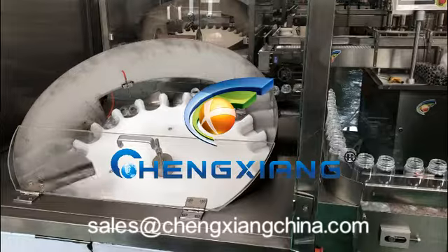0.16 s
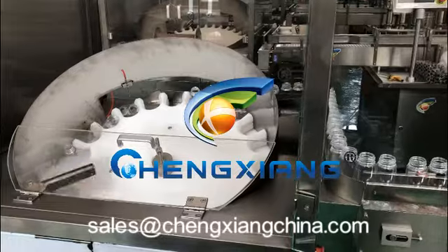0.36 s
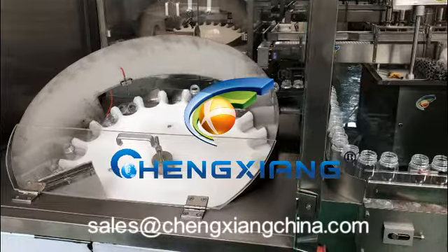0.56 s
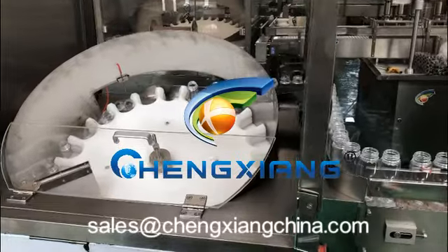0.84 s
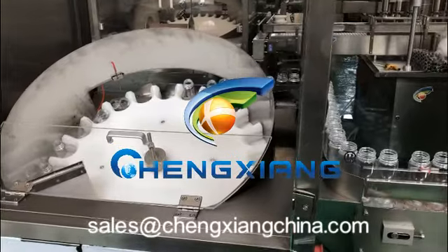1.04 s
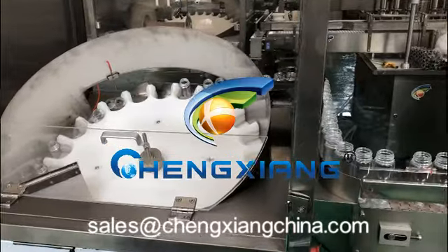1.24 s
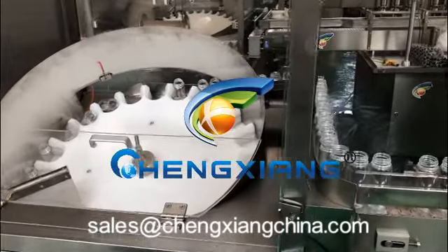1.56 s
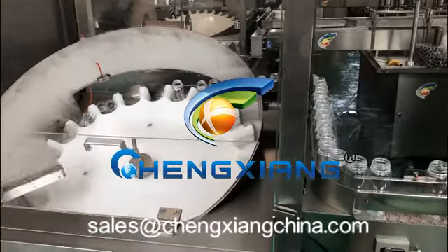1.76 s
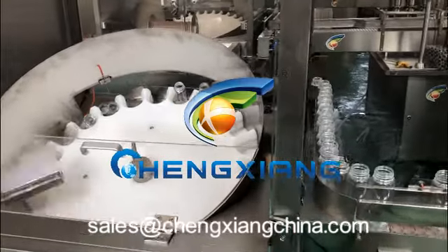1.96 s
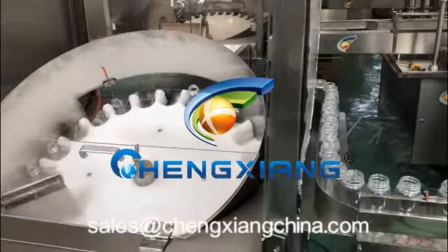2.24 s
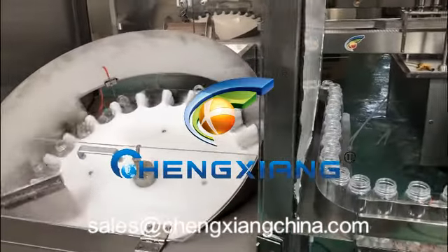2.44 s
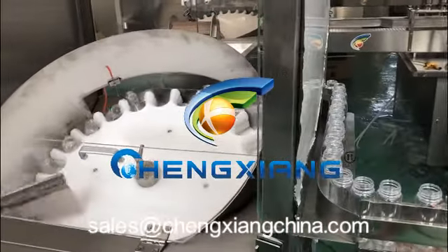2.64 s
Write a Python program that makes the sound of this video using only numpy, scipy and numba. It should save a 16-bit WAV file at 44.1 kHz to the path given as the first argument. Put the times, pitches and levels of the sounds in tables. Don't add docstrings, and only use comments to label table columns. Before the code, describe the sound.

Bottle sorting machine runs steadily, empty plastic bottles clattering amid compressed air bursts and constant hiss

```python
import sys
import numpy as np
from scipy import signal
from scipy.fft import rfft, irfft
from scipy.io import wavfile
from scipy.ndimage import uniform_filter1d
from numba import njit

SR = 44100
rng = np.random.default_rng(int(sys.argv[2]) if len(sys.argv) > 2 else 0)


def wav_out(sig):
    wavfile.write(sys.argv[1], SR, np.round(np.clip(np.atleast_2d(sig).T, -1, 1) * 32767).astype(np.int16))


def nominal_scale(level):
    x = np.asarray(level, float) / 20
    return 10 ** x


N = 123480

# start [s], peak level [dB], centre [Hz], rattle length [s].
KNOCKS = [(.2108, -9.5, 910, 0.021), (0.243, -15.5, 920, 0.017), (0.277, -18, 800, 0.018),
          (0.287, -21, 655, 0.017), (0.31, -10.5, 910, .012), (0.334, -12.5, 710, 0.027),
          (0.404, -14.5, 910, 0.03), (0.424, -18, 800, 0.029), (0.491, -28, 970, 0.013),
          (0.805, -16, 1200, 0.038), (.94, -17.5, 800, 0.02), (1.068, -19.5, 990, .01),
          (1.164, -24, 140, 0.02), (1.834, -19.5, 356, 0.031), (2.195, -27, 225, 0.0148),
          (2.333, -20, 290, 0.031), (2.35, -20.5, 400, 0.025), (2.403, -20, 820, .02),
          (2.478, -24, 750, 0.029), (2.543, -21, 560, 0.069), (2.68, -17, 1040, 0.026),
          (.222, -20, 2600, .012), (0.254, -23, 2600, .02), (.32, -17, 3000, .03), (0.972, -26, 950, 0.017)]
# pitch [Hz], level [dB], decay T60 [s].
BOTTLE_MODES = [(348, -2.5, 0.051), (560, -5.5, 0.11), (669, -11, 0.22), (900, -15.5, 0.17),
                (1006, -6.5, 0.077), (1244, -6.5, 0.024), (1540, 5, 0.06), (781, -13, 0.13),
                (1723, -10, 0.12), (2100, -1.5, 0.17), (2530, -1.5, 0.019), (3260, 6, 0.019),
                (3680, 6, 0.084)]
# start [s], peak level [dB], pitch [Hz], decay T60 [s].
RINGS = [(.211, -14, 940, 0.024), (.211, -20, 257, 0.022), (.217, -22, 1636, 0.071),
         (.222, -18, 870, 0.033), (.236, -22, 330, 0.065), (.24, -13, 910, 0.032), (.248, -26, 2110, 0.073),
         (.278, -19, 690, 0.035), (.288, -24, 610, 0.05), (.304, -22.5, 350, 0.034),
         (.31, -17.5, 1020, 0.021), (.336, -22, 710, 0.047), (.405, -21, 733, 0.076),
         (.408, -19.5, 1030, 0.068), (.414, -22.5, 1650, 0.065), (.806, -23.5, 970, .1),
         (.821, -22, 850, .04), (.832, -28, 720, 0.036), (.939, -22, 560, 0.04), (.946, -23, 990, 0.028),
         (.954, -18.5, 1046, 0.03), (1.166, -18, 62, 0.11), (1.833, -23.5, 1700, .03),
         (1.842, -24, 305, 0.042), (1.862, -25.5, 191, 0.068), (2.35, -24, 300, 0.043),
         (2.367, -26, 900, 0.044), (2.404, -25, 854, .05), (2.43, -28.5, 870, 0.091),
         (2.487, -27, 600, 0.059), (2.497, -25.5, 519, 0.14), (2.625, -30, 466, .08),
         (2.686, -26, 1110, .05), (.226, -18, 3680, 0.016), (.241, -19, 1590, 0.044),
         (.308, -18, 2038, 0.068), (0.338, -17, 1530, 0.13), (0.408, -17.5, 3700, 0.034),
         (.655, -24, 920, 0.077), (.696, -22, 955, 0.083), (.805, -19.5, 2100, 0.13),
         (0.804, -22, 1360, 0.078), (.806, -23, 3830, 0.054), (0.943, -20.5, 1240, 0.05),
         (.967, -21.5, 510, 0.024), (2.275, -26, 443, 0.1), (2.303, -25, 1607, 0.19),
         (2.553, -24, 523, 0.043), (2.775, -27.5, 1615, 0.11)]
# time [s], level [dB], centre [Hz].
TUMBLE = [(.2, -23.5, 804), (.26, -27, 810), (.36, -26.5, 910), (.39, -33, 1090), (.45, -32.5, 1020),
          (.62, -30.5, 1090), (.78, -32.5, 820), (1., -32, 720), (1.2, -35, 760), (1.75, -35, 720),
          (1.95, -44.5, 910), (2.2, -38.5, 800), (2.36, -29.5, 840), (2.6, -30.5, 815), (2.65, -35, 676),
          (2.8, -37, 580)]
# start [s], hold [s], level [dB], release [s], nozzle ring over jet [dB].
JETS = [
    (0.191, 0.19, -29, .015, -3.5),
    (0.402, 0.072, -30, 0.014, -2),
    (0.492, 0.11, -31, 0.023, -2.5),
    (1.963, 0.078, -33, 0.028, 1),
    (2.057, 0.23, -28, 0.028, -4.5),
    (2.335, 0.12, -33.5, .01, 0),
    (2.473, 0.31, -32, 0.026, -1.5),
]
# frequency [Hz], density [dB per Hz].
JET_COLOUR = [(3000, -6.5), (4500, -8.5), (6200, -9.5), (9000, -4), (11000, -8.5), (12600, -7),
              (13500, -2.5), (15800, -2)]
# start [s], hold [s], level [dB], release [s], tilt to treble [dB up above 8 kHz and
BLASTS = [(.844, 0.011, -19.5, 0.012, 1.5), (.864, 0.065, -21, 0.044, 0), (1.148, 0.01, -21, 0.026, 0),
          (1.831, .012, -26.5, 0.026, -2.5), (2.2, .008, -31.5, 0.028, 4), (2.5, 0.0073, -21, 0.012, -2),
          (2.212, 0.0098, -26, 0.01, 1), (2.232, .016, -30.5, 0.0092, -2), (2.19, 0.13, -28, .03, 0),
          (0.77, 0.013, -29.5, 0.0045, 0.5), (2.7, 0.014, -35, 0.014, 3.5), (.55, 0.044, -32, 0.023, 3.5),
          (2.67, 0.065, -31, 0.035, 0), (2.75, 0.017, -33.5, 0.018, -1)]
# frequency [Hz], density [dB per Hz].
BLAST_COLOUR = [(1800, -19), (2600, -8.5), (4500, -2), (6000, 0), (7500, -3), (9500, -1.5), (13500, -1.5),
                (16000, 4)]
# start [s], level [dB], centre [Hz], width [Hz], hold [s].
PUFFS = [
    (1.83, -30, 5400, 1500, 0.011),
    (1.963, -34.5, 4100, 500, 0.025),
    (2.19, -32.5, 3360, 2800, 0.184),
    (2.245, -37.5, 6300, 2000, 0.087),
    (.211, -34.5, 2900, 1600, 0.155),
    (.405, -32.5, 2850, 1600, 0.034),
    (0.72, -33, 1700, 1200, 0.027),
    (2.27, -36.5, 426, 290, 0.112),
    (.53, -42, 295, 130, .2),
    (.94, -33.5, 800, 800, 0.054),
]
# frequency [Hz], density [dB per Hz].
ROAR_COLOUR = [(30, -24), (60, -14), (110, -9), (190, -6.5), (280, -11), (700, -8), (1100, -3), (3600, -10)]
# frequency [Hz], density [dB per Hz].
HISS_COLOUR = [(2600, -73), (3600, -2), (4600, -3.5), (8500, -5), (12500, -5.5), (13600, -1), (14600, -0.5),
               (15200, -0.5), (16000, -6)]
# centre [Hz], width [Hz], rms level [dB].
FRAME = [(426, 97, -46), (539, 38, -44.5), (1030, 74, -48.5), (1537, 57, -46), (1700, 340, -50)]
# time [s], level [dB].
LOAD = [
    (.2, -3),
    (.7, 3),
    (1.1, 0.5),
    (1.5, 0),
    (1.85, -1),
    (2.0, -1),
    (2.12, 0),
    (2.3, 2),
    (2.55, 0),
    (2.8, 0.5),
]
# pitch [Hz], rms level [dB].
HUM = [(50, -48), (100, -47), (401, -44.5)]
# centre [s], low edge [Hz], high edge [Hz], level
# [dB].
SPLITS = [
    (.235, 12700, 15600, -43),
    (.58, 14000, 15800, -35),
    (1.37, 4120, 11200, -38),
    (1.463, 5600, 7050, -43),
    (1.463, 11600, 13300, -43),
    (1.695, 10300, 11900, -45),
    (1.765, 7850, 10900, -38),
    (1.812, 4500, 5700, -45),
    (2.74, 8250, 11200, -35),
]

TUMBLES_PER_S = 600
RING_SPAN_OCT, SCATTER_DB = 1.78, -1
THUD_DB, THUD_WIDTH = 8.5, 0.7
RING_PAIR = 0.053
ATTACK_S, FLUTTER_DB = 0.002, -0.5
NOZZLE_HZ, NOZZLE_WIDTH_HZ = 11600, 800
PATCHY_DB = 3.2
ROAR_DB, HISS_DB = -30.5, -29.5
NEAR_LOW_HZ = 157
HALL_T60_S, HALL_DAMP, HALL_DB = 0.47, 0.19, -9.5
START_S, SPLIT_S, TOP_HZ = .2105, .046, 15800


def knock(hz, rattle):
    taps = np.zeros(SR // 4)
    late = np.r_[0, rng.random(23)]
    strength = np.r_[1, rng.uniform(-1, 1, 23)] * np.exp(-late)
    np.add.at(taps, (late * rattle * SR).astype(int), strength)
    width = THUD_WIDTH * hz
    hit = peak(band(band(np.gradient(taps), hz, width), hz, width), THUD_DB)
    for mode_hz, db, t60 in BOTTLE_MODES:
        near_db = -6 * (np.log2(mode_hz / hz) / RING_SPAN_OCT) ** 2
        scatter_db = SCATTER_DB * rng.uniform(-1, 1)
        pitch = mode_hz * (.96 + 0.0513 * rng.random())
        hit += peak(mode(taps, pitch, 0.75 * t60), db + near_db + scatter_db)
    return hit


def wall_ring(hz, t60):
    push = np.r_[np.hanning(7), np.zeros(SR // 4 - 7)]
    main = peak(mode(mode(push, hz, t60 / 2), hz, t60 / 2), 0)
    return main + 0.34 * mode(push, hz * (1 - RING_PAIR), 0.54 * t60)


def knocks():
    out, size = np.zeros(N + SR), SR // 4
    for s, db, hz, rattle in KNOCKS:
        out[int(s * SR):int(s * SR) + size] += peak(knock(hz, rattle), db)
    for s, db, hz, t60 in RINGS:
        out[int(s * SR):int(s * SR) + size] += peak(wall_ring(hz, t60), db)
    return out[:N]


def tumble():
    count, t = int(TUMBLES_PER_S * N / SR), np.arange(N) / SR
    s, effort_db, centre = np.array(TUMBLE).T
    centre = np.interp(t, s, centre)
    at = rng.integers(0, N, count)
    size = nominal_scale(1.9 * rng.exponential(1, count))
    out = np.zeros(N)
    for hz, db, _ in BOTTLE_MODES:
        near_db = -3.2 * np.log2(hz / centre) ** 2
        for pitch in (.93, 1.06):
            excited = rng.random(count) < .4
            taps = np.zeros(N)
            taps[at] = size * rng.standard_normal(count) * excited
            out += nominal_scale(0.36 * db + near_db) * mode(taps, pitch * hz, 0.028)
    return level(out, 0) * nominal_scale(np.interp(t, s, effort_db))


def nozzle_jets():
    jet = noise(JET_COLOUR, 0.23)
    ringing = band(band(jet, NOZZLE_HZ, NOZZLE_WIDTH_HZ), NOZZLE_HZ, NOZZLE_WIDTH_HZ)
    ringing = level(ringing, 0)
    out = np.zeros(N)
    for s, hold, db, release, ring_db in JETS:
        out += nominal_scale(db) * valve(s, hold, release) * (jet + nominal_scale(ring_db) * ringing)
    return out * nominal_scale(FLUTTER_DB * walk(40))


def valve_blasts():
    gas = noise(BLAST_COLOUR, 0.44) * nominal_scale(FLUTTER_DB * walk(60))
    low = lowpass(gas, 8000)
    out = np.zeros(N)
    for s, hold, db, release, tilt in BLASTS:
        coloured = nominal_scale(-tilt) * low + nominal_scale(tilt) * (gas - low)
        out += nominal_scale(db) * valve(s, hold, release) * coloured
    return out


def puffs():
    out = np.zeros(N)
    for s, db, hz, width, hold in PUFFS:
        hiss = band(band(rng.standard_normal(N), hz, width), hz, width)
        out += level(hiss, db) * valve(s, hold, 0.0078)
    return out


def machine():
    t = np.arange(N) / SR
    hum = np.zeros(N)
    for hz, db in HUM:
        tone = np.sin(2 * np.pi * (hz * t + rng.random()))
        hum += np.sqrt(2) * nominal_scale(db + 0.53 * walk(8.04)) * tone
    roar = nominal_scale(ROAR_DB) * noise(ROAR_COLOUR, 0.46)
    low = lowpass(roar, 700)
    shake = rng.standard_normal(N)
    frame = sum(level(band(shake, hz, width), db) for hz, width, db in FRAME)
    load = nominal_scale(np.interp(t, *np.array(LOAD).T))
    hiss = nominal_scale(HISS_DB) * patchy(noise(HISS_COLOUR, 0.18))
    return roar - low + (low + frame) * load + hiss + hum


@njit
def hall(x, lags, gain, damp):
    line, soft, out = np.zeros((8, 4096)), np.zeros(8), np.zeros(len(x))
    for i in range(len(x)):
        total = 0.
        for k in range(8):
            soft[k] += (1 - damp) * (gain[k] * line[k, (i - lags[k]) & 4095] - soft[k])
            total += soft[k]
            out[i] += soft[k] * (1 - 2 * (k % 2))
        for k in range(8):
            line[k, i & 4095] = x[i] + soft[k] - total / 4
    return out / np.sqrt(8)


def valve(start, hold, release):
    t = np.arange(N) / SR - start
    return np.clip(t / ATTACK_S, 0, 1) * np.exp(-np.maximum(t - hold, 0) / release)


def noise(colour, flicker_db):
    octave = np.log2(np.arange(1, N // 2 + 2) * SR / N)
    hz, db = np.array(colour).T
    edge = np.log2(hz)
    spec = rfft(rng.standard_normal(N)) * nominal_scale(np.interp(octave, edge, db, -120, -120))
    out = np.zeros(N)
    for centre in np.arange(edge[0], edge[-1] + .5, .5):
        weight = np.clip(1 - 2 * abs(octave - centre), 0, 1)
        out += nominal_scale(flicker_db * walk(12.6)) * irfft(spec * weight, N)
    return level(out, 0)


def patchy(x):
    spec = signal.stft(x, nperseg=1024)[2]
    field = uniform_filter1d(rng.standard_normal(spec.shape), size=2, axis=0) * np.sqrt(2)
    out = signal.istft(spec * nominal_scale(PATCHY_DB * field), nperseg=1024)[1][:N]
    return level(out, 10 * np.log10(np.mean(x ** 2)))


def walk(rate):
    k = int(SR / rate)
    steps = np.repeat(rng.standard_normal(N // k + 1), k)
    return 1.3 * uniform_filter1d(uniform_filter1d(steps, k), k)[:N]


@njit
def ring(x, p):
    y, z = np.empty(len(x)), 0j
    for i in range(len(x)):
        z = z * p + x[i]
        y[i] = z.imag
    return y


def mode(x, hz, t60):
    return ring(x, np.exp(2j * np.pi * hz / SR - np.log(1000) / (t60 * SR)))


def band(x, hz, width):
    return mode(x, hz, np.log(1000) / np.pi / width)


def lowpass(x, hz):
    return signal.sosfilt(signal.butter(2, hz, fs=SR, output="sos"), x)


def level(x, db):
    return x * nominal_scale(db) / np.sqrt(np.mean(x ** 2))


def peak(x, db):
    return x * nominal_scale(db) / abs(x).max()


def scene():
    bottles = knocks() + tumble()
    bottles = signal.sosfilt(signal.butter(2, NEAR_LOW_HZ, "high", fs=SR, output="sos"), bottles)
    near = bottles + patchy(nozzle_jets() + valve_blasts()) + puffs()
    lags = np.array([701, 887, 1093, 1297, 1523, 1801, 2099, 2447])
    wet = hall(near, lags, nominal_scale(-60 * lags / SR / HALL_T60_S), HALL_DAMP)
    mono = near + nominal_scale(HALL_DB) * wet + machine()
    return np.array([mono, mono])


def low_pass(x):
    return signal.sosfilt(signal.butter(12, 15830, fs=SR, output="sos"), x)


def record(dry):
    t = np.arange(N) / SR
    side = np.zeros(N)
    for s, low, high, db in SPLITS:
        bandpass = signal.butter(8, [low, high], "band", fs=SR, output="sos")
        swell = np.cos(np.pi * np.clip((t - s) / SPLIT_S, -.5, .5))
        side += level(signal.sosfilt(bandpass, rng.standard_normal(N)), db) * swell
    wide = dry + side * np.array([[1], [-1]])
    mix = signal.sosfilt(signal.ellip(10, .2, 70, TOP_HZ, fs=SR, output="sos"), wide)
    return low_pass(mix * (t >= START_S))


dry = scene()
out = record(dry)
wav_out(out)
```